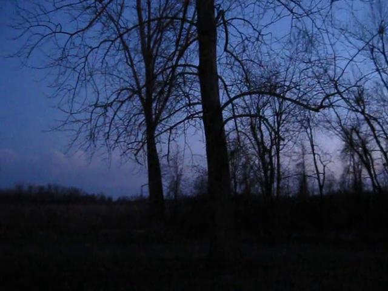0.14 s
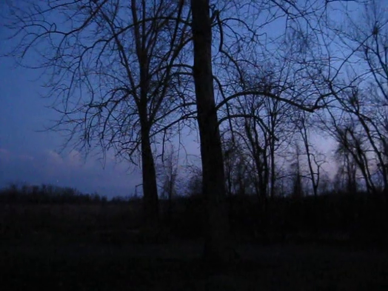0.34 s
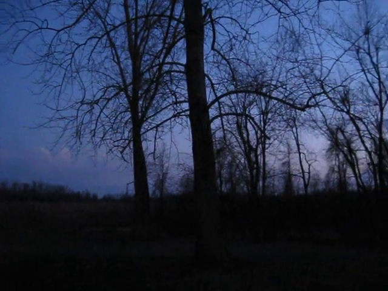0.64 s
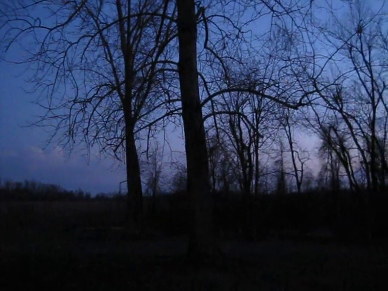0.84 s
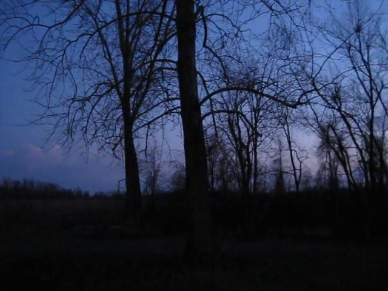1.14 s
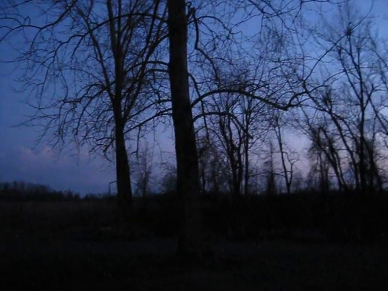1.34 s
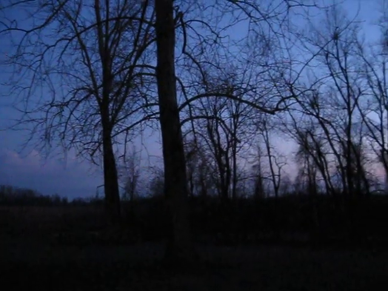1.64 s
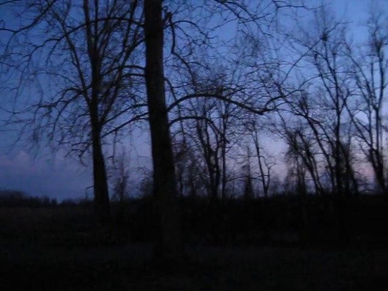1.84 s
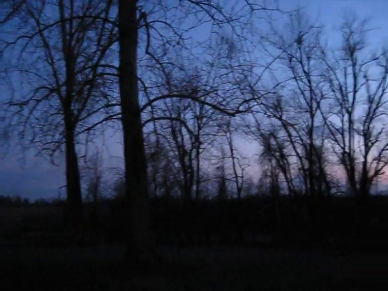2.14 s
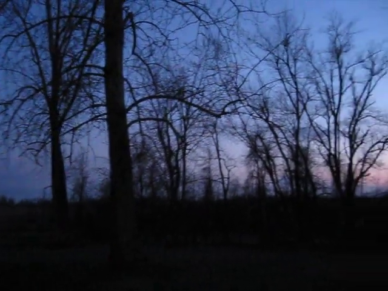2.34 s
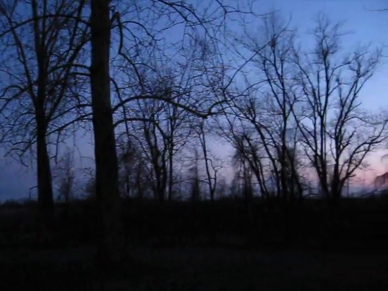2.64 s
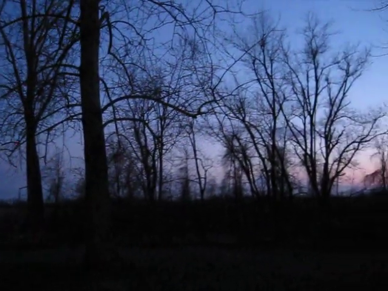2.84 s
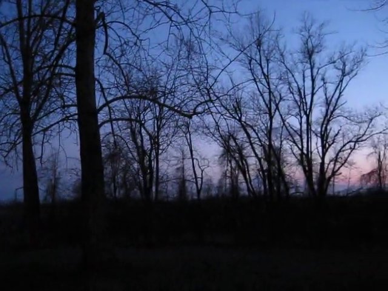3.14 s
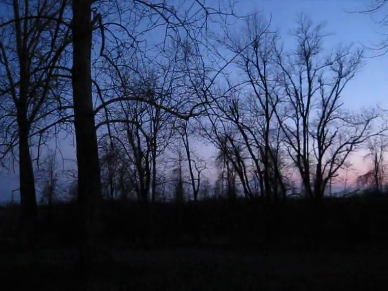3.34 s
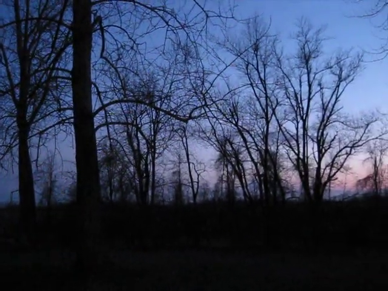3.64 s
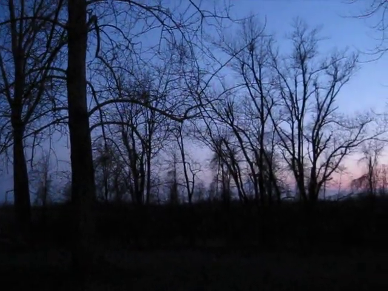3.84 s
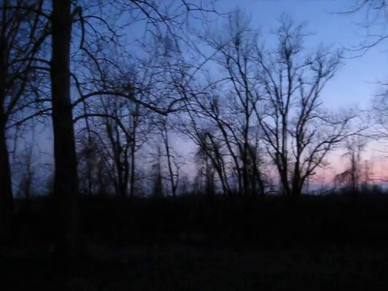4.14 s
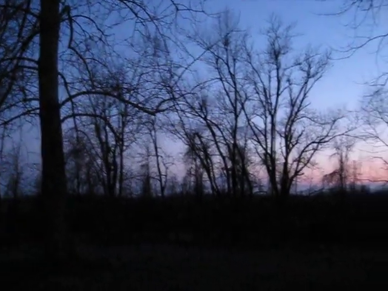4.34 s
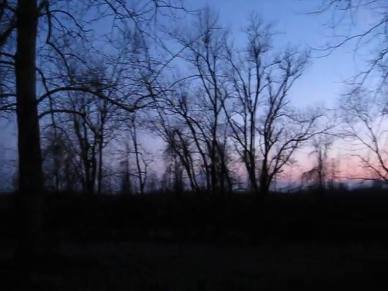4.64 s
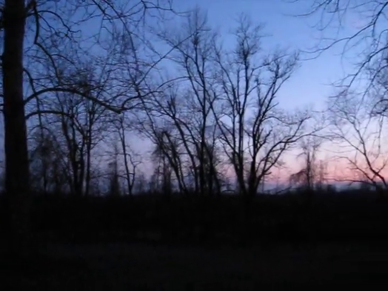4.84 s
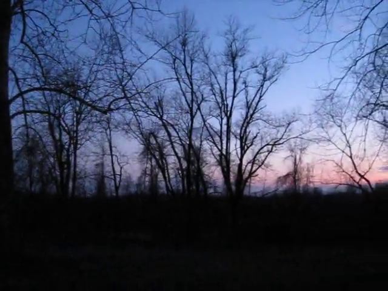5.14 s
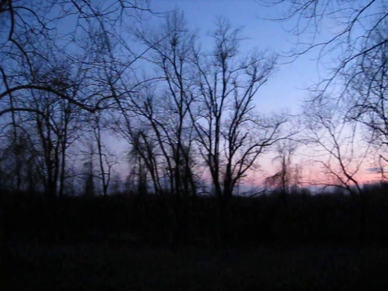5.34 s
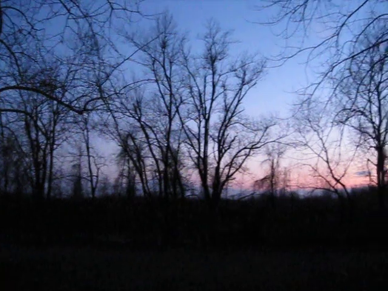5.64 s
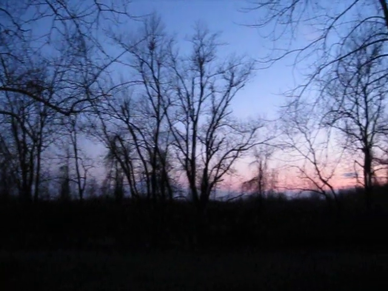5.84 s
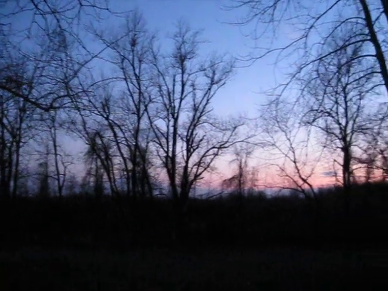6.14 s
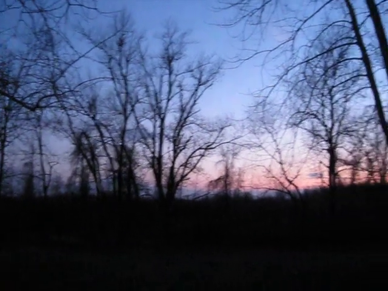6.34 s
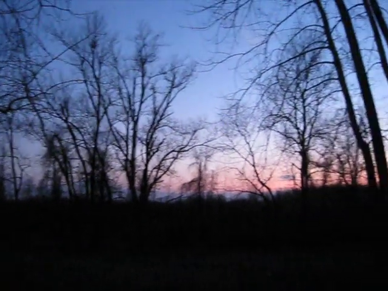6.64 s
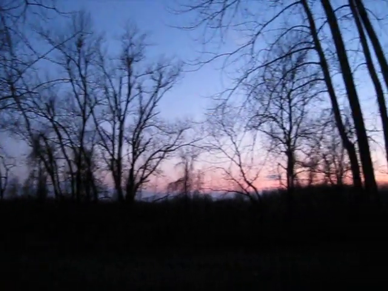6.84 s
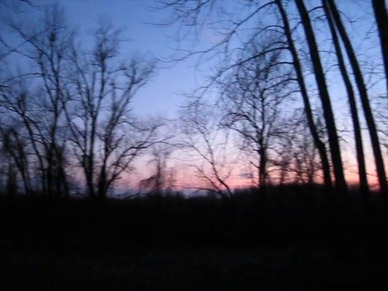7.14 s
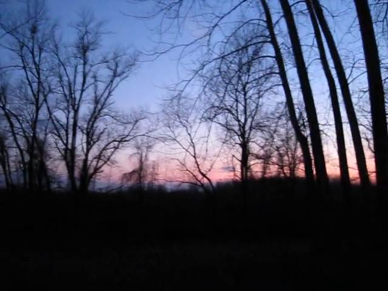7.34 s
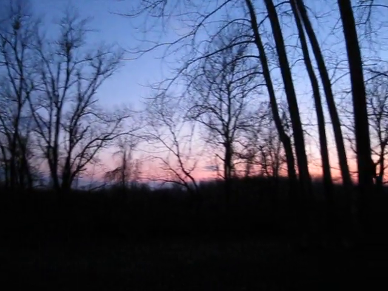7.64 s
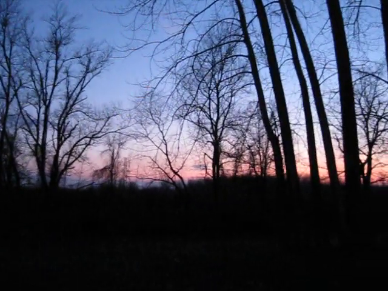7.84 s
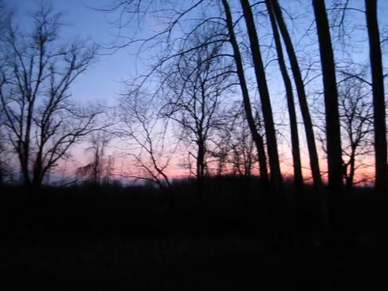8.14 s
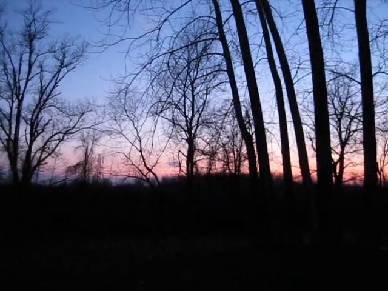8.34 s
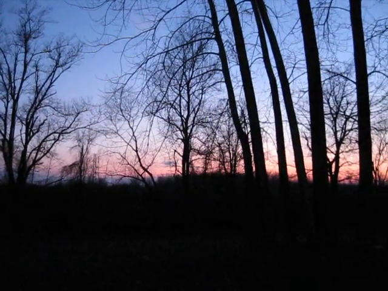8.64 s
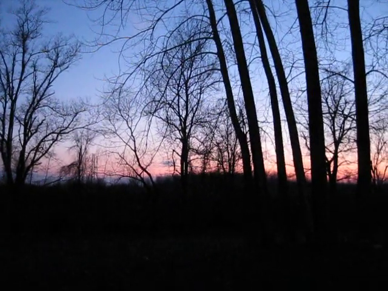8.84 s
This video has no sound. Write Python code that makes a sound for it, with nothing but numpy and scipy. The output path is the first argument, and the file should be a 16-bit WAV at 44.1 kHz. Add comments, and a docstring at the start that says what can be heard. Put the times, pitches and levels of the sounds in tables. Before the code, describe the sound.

Outdoors at dusk beside bare woods, about a hundred small frogs peep in a continuous narrow, high ringing band. Sharp, brief bird chips come singly every half second or so, some close and crisp, others distant and echoing among trunks. Quick twitters and a run of faint yelps arrive near the end. A distant engine hums very low beneath soft air hiss, all heard from one fixed mono microphone.

```python
"""One ringing band is heard first: about a hundred spring peepers at dusk, each repeating a short rising tone.
Above it birds give sharp two-voiced chips, twitters as arched glides, one buzz as pulsed noise and faint far notes;
sparse decaying reflections make the wood's echo.
Beneath lie a distant engine, a sum of harmonics over a low rumble, and evening air, which is filtered noise."""
import sys
import numpy as np
from scipy import signal
from scipy.fft import rfft, irfft
from scipy.io import wavfile
from scipy.ndimage import map_coordinates

SR = 44100
rng = np.random.default_rng(int(sys.argv[2]) if len(sys.argv) > 2 else 0)


def wrap_up_sound(samples):
    """Save the sound to the file named by the first command line argument, as 16-bit audio."""
    columns = np.atleast_2d(samples).T
    # keep every value between -1 and 1, then stretch to whole-number steps
    tamed = np.clip(columns, -1, 1)
    steps = np.round(tamed * 32767).astype(np.int16)
    wavfile.write(sys.argv[1], SR, steps)


N = 396900
TIME = np.arange(N) / SR  # s

# Gain of the massed chorus. Each row: time in seconds, gain in dB.
CHORUS_GAIN = [(0, -32), (2.5, -32.5), (5.5, -33), (7, -34.5), (9, -34)]
# Spectrum of the farthest frogs, blurred into one ring. Each row: frequency in Hz, relative density in dB per Hz.
BLUR_SPECTRUM = [(2000, -36.5), (2400, -23.5), (2560, -12), (2720, -1), (2900, 1.5), (3080, -1), (3250, -8),
                 (3500, -18), (3900, -30.5), (4500, -56)]
# Nearer frogs that stand out. Each row: start in seconds, middle pitch in Hz before a slight arch, level in dB.
NEAR_PEEPS = [(0.328, 2980, -45.5), (.86, 3040, -36.5), (1.061, 3070, -36), (1.621, 3090, -41),
              (1.74, 3107, -38), (2.33, 2935, -34.5), (2.714, 2900, -34), (3.169, 3070, -49),
              (4.119, 3020, -38), (5.519, 3040, -38), (6.552, 2915, -37.5), (8.378, 3100, -45)]

# Two-voiced chips. Each row: time in seconds, bird, settled low voice in Hz, settled high voice in Hz,
# level in dB, high voice in dB relative to that level (before its direct and scattered shares).
CHIPS = [(.057, "far", 4226, 7100, -45, -11), (0.549, "far", 4320, 7180, -43, -11.5),
         (1.093, "near", 4290, 6640, -32, -12), (1.384, "far", 4385, 7120, -39, -15),
         (1.872, "near", 4410, 6660, -32.5, -12), (2.378, "far", 4275, 7040, -43, -12.5),
         (3.028, "hidden", 4206, 6600, -41, -11.5), (3.156, "far", 4340, 6970, -46, -10.5),
         (3.673, "near", 4405, 6880, -36.5, -12), (3.753, "hidden", 4246, 6600, -39.5, -15),
         (4.006, "far", 4330, 7000, -44.5, -11.5), (4.725, "near", 4225, 6560, -39, -7.5),
         (4.974, "far", 4410, 6970, -46.5, -9.5), (5.505, "near", 4380, 6940, -37.5, -8.5),
         (5.614, "hidden", 4080, 6700, -39.5, -16.5), (5.883, "far", 4273, 6930, -43.5, -15.5),
         (6.736, "far", 4304, 6880, -47.5, -11), (7.199, "near", 4270, 6810, -37, -10),
         (7.387, "far", 4280, 7020, -47, -12.5), (7.887, "hidden", 4070, 6510, -39.5, -17),
         (8.858, "near", 4250, 6650, -39, -10)]
# The three chipping birds. Each entry: sum tone in dB relative to the high voice,
# echo in dB relative to the chip, echo decay time (to -60 dB) in seconds.
CHIP_BIRDS = {"near": (-4, -8.5, 0.58), "far": (-7.5, 4.7, 0.66), "hidden": (-20, -1.5, 0.35)}
# Swells of a chip's parts. Each: start in seconds from the chip's time, attack, hold and release in seconds.
LOW_SWELL = (.002, .013, .014, .05)
HIGH_SWELL = (-0.027, 0.01, 0.024, 0.085)
DROP_SWELL = (.063, .008, .004, .018)
# Glides of a chip's parts. Each: start in seconds from the chip's time, first pitch as a share of the settled
# pitch, time constant in seconds.
LOW_GLIDE = (0.00335, .83, 0.00697)
HIGH_GLIDE = (-.008, .64, .0095)
DROP_GLIDE = (.064, 2.8, .014)
# The falling note that closes a chip. Each entry: level for that bird in dB relative to the chip.
DROP_DB = {"near": -8, "far": 1, "hidden": -12}
DROP_HZ = 1400  # pitch that the falling note approaches

# Twitters. Each row: start in seconds, time stretch as a factor, level in dB.
TWITTERS = [(7.087, 1.03, -38), (8.16, 1.03, -53), (8.384, .98, -37), (8.44, .87, -50)]
# Arches of a twitter, before stretching. Each row: start in seconds, length in seconds, pitch at the ends in Hz,
# pitch at the top in Hz, pointedness as an exponent, then the levels at its start and end in dB
# relative to the twitter, before the lift of low pitches.
TWITTER_ARCHES = [(0, .035, 4500, 8450, .35, -28, -13), (.034, .029, 4500, 7450, .3, -6, -24),
                  (.051, .023, 3900, 5200, 2.5, -3, -3)]
# Whistles of far birds. Each row: start in seconds, length in seconds, first pitch in Hz, last pitch in Hz, level in dB.
FAR_NOTES = [(.04, 0.088, 2060, 2230, -52), (0.175, 0.086, 1970, 2150, -49),
             (.33, 0.113, 7100, 7200, -61.5), (2.2, .07, 1750, 1810, -56), (2.417, 0.074, 1783, 1700, -54),
             (2.584, .055, 4100, 4450, -49), (2.68, 0.078, 1780, 1846, -55), (2.78, .053, 2200, 2090, -54),
             (3.344, 0.077, 2500, 2230, -49), (4.992, .08, 2040, 2250, -49), (5.109, .1, 2240, 2250, -51),
             (5.698, .084, 2110, 2276, -53), (5.78, 0.067, 4130, 3930, -51), (7.307, .035, 5500, 4890, -58)]
# A run of far yelps that tends to grow louder
YELP_START_S, YELP_GAP_S, YELP_FIRST_DB, YELP_LAST_DB = 7.77, .0828, -57, -52
# Course of the nasal buzz. Each row: time in seconds, level in dB.
BUZZ_LEVEL = [(.68, -64), (.75, -51), (.84, -54), (.9, -57.5)]
# Spectrum of the buzz. Each row: frequency in Hz, relative gain in dB.
BUZZ_SPECTRUM = [(3300, -30), (4300, 6), (4900, 1), (5700, -7), (6800, -17), (8000, -37)]

# Harmonics of the engine. Each row: multiple of the cycle rate, relative level in dB.
ENGINE_LINES = [(4, -7), (5, 0), (6, -10), (7, -11), (8, -12.5), (9, -15), (10, -26)]
# The engine nearly holds its speed, then slowly picks up. Each row: time in seconds, pitch of the fifth line in Hz.
ENGINE_SPEED = [(0, 88.93), (5, 88.4), (6.8, 89.73), (9, 94.05)]
# Its hum comes and goes over the fields. Each row: time in seconds, level in dB.
ENGINE_LEVEL = [(0.0, -53), (0.25, -52.5), (0.5, -58.5), (2.01, -52.5), (2.38, -64), (2.43, -54),
                (3.38, -53.5), (3.56, -51), (5.31, -54), (5.81, -58), (7.82, -52.5), (9.0, -56)]
# Far traffic swells and passes. Each row: time in seconds, level in dB.
RUMBLE_LEVEL = [(0, -65), (3.5, -60.5), (5, -56), (6.7, -55), (8, -61), (9, -60)]
# Spectrum of that rumble. Each row: frequency in Hz, relative density in dB per Hz.
RUMBLE_SPECTRUM = [(20, -22), (45, -16), (75, -2.5), (130, -3.5), (180, -1.5), (260, -14), (450, -18.5),
                   (900, -39)]
# Spectrum of evening air and microphone hiss. Each row: frequency in Hz, relative density in dB per Hz.
AIR_SPECTRUM = [(20, -6), (45, 2.5), (250, 1), (550, -3), (820, 1), (1200, -2), (1520, 1.5), (2200, -1),
                (3800, -3.5), (4300, -5), (4900, -9), (6600, -15.5), (8600, -21), (15700, -21.5)]
AIR_DB = -49.5  # level about which the hiss drifts
EDGE_HZ = 15750  # upper band limit


def amp(db):
    """Logarithmic level: decibels become a linear gain."""
    return 10 ** (np.asarray(db) / 20)


def unit(x):
    """Normalization: scales a signal to rms 1."""
    return x / np.sqrt(np.mean(x ** 2) + 1e-20)


def colour(points, hz):
    """Spectral interpolation: gain at hz, with the dB values joined on a log frequency axis."""
    f, db = np.transpose(points)
    return amp(np.interp(np.log(hz + 1), np.log(f + 1), db))


def tinted(x, points):
    """Linear filtering: multiplies the spectrum by a gain curve; the result has rms 1."""
    hz = np.fft.rfftfreq(len(x), 1 / SR)
    return unit(irfft(rfft(x) * colour(points, hz), len(x)))


def along(rows, t):
    """Linear interpolation: the value columns of a curve table at times t."""
    s, *columns = np.transpose(rows)
    return [np.interp(t, s, c) for c in columns]


def drift(rate, size=N):
    """Band-limited chance: a smooth random curve of rms near 1 through rate knots a second."""
    knots = rng.standard_normal(2000)
    return map_coordinates(knots, [np.arange(size) / SR * rate], order=2, mode="wrap")


def phase(hz):
    """Phase is the running integral of frequency."""
    return 2 * np.pi * np.cumsum(hz) / SR


def envelope(t, start, attack, hold, release):
    """Amplitude envelope: squared linear ramps give the attack and release soft feet."""
    rising = (t - start) / attack
    falling = 1 + (start + attack + hold - t) / release
    return np.clip(np.minimum(rising, falling), 0, 1) ** 2


def glide(t, start, share, seconds):
    """Exponential relaxation: pitch as a share of the value that it settles on."""
    return 1 + (share - 1) * np.exp(-np.maximum(t - start, 0) / seconds)


def add(mix, s, sound):
    """Superposition: lays a sound into the mix at s seconds, cut off at the mix's ends."""
    start = round(s * SR)
    sound = sound[max(-start, 0):]
    part = mix[max(start, 0):][:len(sound)]
    part += sound[:len(part)]


def woods(x, t60):
    """Multiple scattering: sparse reflections from trunks build up, then decay by 60 dB in t60 seconds."""
    t = np.arange(SR) / SR
    reflections = rng.standard_normal(SR) * (rng.random(SR) < 1 / 40)
    taps = reflections * amp(-60 * t / t60) * (1 - np.exp(-t / 0.01))
    return signal.fftconvolve(x, taps / np.linalg.norm(taps))


def whistle(length, start_hz, end_hz, arch=0):
    """Frequency modulation: one gliding sinusoid swells and fades; arch lifts its middle pitch by that share."""
    u = np.linspace(0, 1, int(length * SR))
    swell = np.sin(np.pi * u)
    hz = (start_hz + (end_hz - start_hz) * u) * (1 + arch * swell)
    return np.sqrt(2 * abs(swell)) * np.sin(phase(hz))


def peep(hz, length=.115, rise=0.03593):
    """Resonant radiation: a frog's vocal sac rings on a single rising tone."""
    return whistle(length, hz * (1 - rise), hz * (1 + rise), arch=0.0058)


def frogs(count=110, mean_hz=2925, spread_hz=105, period=.8, distance_db=2.5,
          echo_db=-3, callers_db=-3.5, blur_db=-3.5):
    """Incoherent summation: callers with their own pitch and pace merge, the farthest into narrow-band noise."""
    callers = np.zeros(N)
    traits = rng.standard_normal((2, count)).clip(-2, 2)
    timing = rng.random((2, count))
    for size, near, pace, start in zip(*traits, *timing):
        gap = period * (.75 + pace / 2)
        for s in np.arange(-start * gap, N / SR, gap):
            late, sharp, loud = rng.standard_normal(3)
            gain = amp(distance_db * near + 2 * loud)
            hz = mean_hz + spread_hz * size + 25 * sharp
            add(callers, s + .04 * late, gain * peep(hz))
    callers = unit(callers + amp(echo_db) * woods(callers, t60=0.88)[:N])
    blur = tinted(rng.standard_normal(N), BLUR_SPECTRUM)
    chorus = amp(callers_db) * callers + amp(blur_db) * blur
    chorus *= amp(along(CHORUS_GAIN, TIME)[0])
    for s, hz, db in NEAR_PEEPS:
        add(chorus, s, amp(db) * peep(hz))
    return chorus


def squeaks(per_s=20, low_hz=3330, high_hz=3750, length=0.0052, level_db=-47.0,
            spread_db=7.0, top_db=-3, fade_db_per_s=0.2):
    """Random arrivals: brief squeaks above the chorus, fewer and fainter with pitch; all slowly fade."""
    out = np.zeros(N)
    for when, pitch, bend, loud in rng.random((int(per_s * N / SR), 4)):
        s = when * N / SR
        height = pitch ** 2  # crowds the squeaks towards the low end
        hz = low_hz + (high_hz - low_hz) * height
        db = level_db + top_db * height + spread_db * (2 * loud - 1) - fade_db_per_s * s
        add(out, s, amp(db) * whistle(length, hz, hz * (.93 + 0.153 * bend)))
    return out


def chips(low_octave_db=-32, high_octave_db=-17, rasp=0.37, rasp_hz=215, high_direct_db=-2,
          twigs_db=-9, sweep_db=10, drop_echo_db=-1):
    """Nonlinear coupling: both sides of the syrinx sing at once, and a tone rings at the sum of their pitches."""
    out = np.zeros(N)
    t = np.arange(-.03, .11, 1 / SR)  # s from the chip's time
    low_share, high_share = glide(t, *LOW_GLIDE), glide(t, *HIGH_GLIDE)
    low_swell = envelope(t, *LOW_SWELL)
    # the high voice starts first; it is louder, stutters and is hoarse before it settles
    stutter = 1 + rasp * np.sin(2 * np.pi * rasp_hz * t) * (t < 0)
    high_swell = envelope(t, *HIGH_SWELL) * amp(sweep_db * (1 - high_share)) * stutter
    # random pitch deviation as a share of the pitch
    low_jitter, high_jitter = .007, np.interp(t, [-.006, .004], [.07, .009])
    falling = envelope(t, *DROP_SWELL) * np.sin(phase(DROP_HZ * glide(t, *DROP_GLIDE)))
    for s, bird, low_hz, high_hz, db, upper_db in CHIPS:
        sum_db, echo_db, echo_t60 = CHIP_BIRDS[bird]
        drop = amp(DROP_DB[bird]) * falling
        low = phase(low_hz * low_share * (1 + low_jitter * drift(402, size=len(t))))
        high = phase(high_hz * high_share * (1 + high_jitter * drift(1514, size=len(t))))
        lower = low_swell * (np.sin(low) + amp(low_octave_db) * np.sin(2 * low))
        sum_tone = amp(sum_db) * low_swell * np.sin(low + high)
        high_voice = np.sin(high) + amp(high_octave_db) * np.sin(2 * high) + sum_tone
        upper = amp(upper_db) * high_swell * high_voice
        peak = np.sqrt(2) * amp(db)
        # twigs scatter part of the treble out of the direct path
        add(out, s + t[0], peak * (lower + drop + amp(high_direct_db) * upper))
        add(out, s + t[0], peak * amp(twigs_db) * woods(upper, t60=0.18))
        echoed = lower + upper + amp(drop_echo_db) * drop
        add(out, s + t[0], peak * amp(echo_db) * woods(echoed, t60=echo_t60))
    return out


def twitters(echo_db=-8, fade_s=0.0017, low_lift_db=8):
    """Frequency modulation: a thin whistle loops down in three quick arches, lifted in level where pitch is low."""
    out = np.zeros(N)
    for s, stretch, db in TWITTERS:
        for start, length, end_hz, top_hz, pointed, first_db, last_db in TWITTER_ARCHES:
            t = np.arange(0, length, 1 / (SR * stretch))
            hz = end_hz + (top_hz - end_hz) * np.sin(np.pi * t / length) ** pointed
            level_db = db + np.linspace(first_db, last_db, len(t)) + low_lift_db * (1 - hz / top_hz)
            swell = envelope(t, 0, fade_s, length - 2 * fade_s, fade_s)
            add(out, s + stretch * start, amp(level_db) * swell * np.sin(phase(hz)))
    return out + amp(echo_db) * woods(out, t60=0.46)[:N]


def buzz(pulse_hz=205, pulse_decay=0.36):
    """Pulse excitation: an even train of clicks, each with a decaying puff of noise, sounds nasal when filtered."""
    cycle = TIME * pulse_hz % 1
    clicks = np.diff(cycle, prepend=0) < 0
    puffs = np.exp(-cycle / pulse_decay) * rng.standard_normal(N)  # decay as a share of the cycle
    sounding = (TIME > BUZZ_LEVEL[0][0]) & (TIME < BUZZ_LEVEL[-1][0])
    source = unit(clicks * 1.) + unit(puffs)
    return tinted(source, BUZZ_SPECTRUM) * amp(along(BUZZ_LEVEL, TIME)[0]) * sounding


def far_birds(yelp_hz=1800, yelp_length=0.043, yelp_spread_db=2, yelp_jitter_s=0.0099,
              yelp_pitch_spread=.012, echo_db=-6, count=14):
    """Reverberation over distance: faint whistles and a run of arched yelps come with echoes of the wood."""
    out = np.zeros(N)
    for s, length, start_hz, end_hz, db in FAR_NOTES:
        add(out, s, amp(db) * whistle(length, start_hz, end_hz, arch=0.0127))
    for k, db in enumerate(np.linspace(YELP_FIRST_DB, YELP_LAST_DB, count)):
        late, sharp, loud = rng.standard_normal(3)
        hz = yelp_hz * (1 + yelp_pitch_spread * sharp)
        s = YELP_START_S + k * YELP_GAP_S + yelp_jitter_s * late
        yelp = whistle(yelp_length, hz, hz * .97, arch=0.072)
        add(out, s, amp(db + yelp_spread_db * loud) * yelp)
    return out + amp(echo_db) * woods(out, t60=0.78)[:N]


def engine(waver_db=2):
    """Harmonic series: multiples of a far engine's cycle rate waver over the fields, above a low noise rumble."""
    (hz,), (db,) = along(ENGINE_SPEED, TIME), along(ENGINE_LEVEL, TIME)
    cycle = phase(hz / 5)
    lines = np.zeros(N)
    for k, line_db in ENGINE_LINES:
        # the fifth line follows the level curve alone
        gain = amp(line_db + waver_db * drift(4.6) * (k != 5))
        lines += gain * np.sin(k * cycle + 2 * np.pi * rng.random() + 0.5 * drift(4.0))
    rumble = tinted(rng.standard_normal(N), RUMBLE_SPECTRUM) * amp(along(RUMBLE_LEVEL, TIME)[0])
    return np.sqrt(2) * amp(db) * lines + rumble


def air(swell_db=-0.78):
    """Broadband noise: a soft hiss whose level drifts slightly."""
    return tinted(rng.standard_normal(N), AIR_SPECTRUM) * amp(AIR_DB + swell_db * drift(1.77))


def scene():
    """Superposition: the pressures of frogs, birds, engine and air add at one microphone."""
    animals = frogs() + squeaks() + chips() + twitters() + buzz() + far_birds()
    return (animals + engine() + air())[None]


def record(dry, notch_hz=7900, notch_width_hz=1100):
    """Linear response: a deep notch in the treble, then a steep low-pass band limit."""
    hz = np.fft.rfftfreq(N, 1 / SR)
    notch = (hz - notch_hz) / (hz - notch_hz - .5j * notch_width_hz)
    notched = irfft(rfft(dry) * notch, N)
    band_limit = signal.firwin(1023, EDGE_HZ, window=("kaiser", 9), fs=SR)
    return signal.oaconvolve(notched, band_limit[None], "same")


dry = scene()
out = record(dry)
wrap_up_sound(out)
```